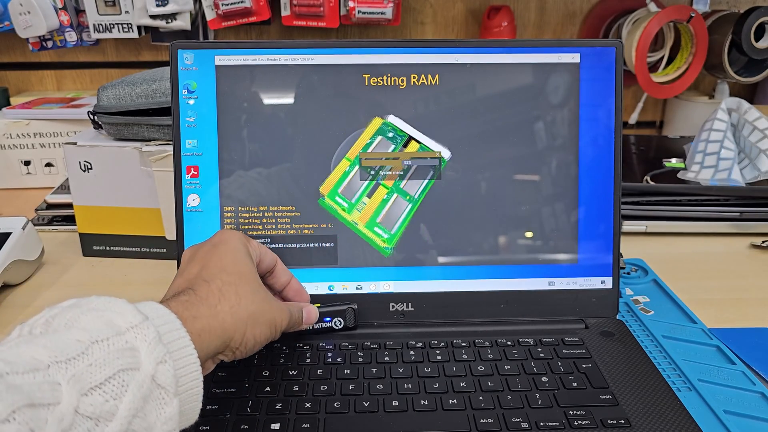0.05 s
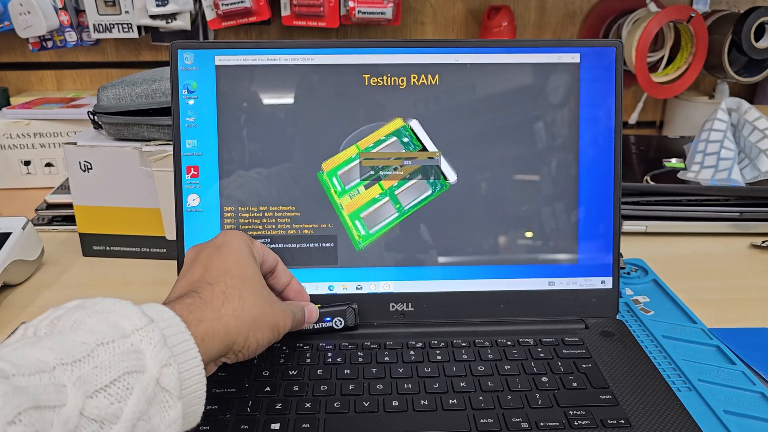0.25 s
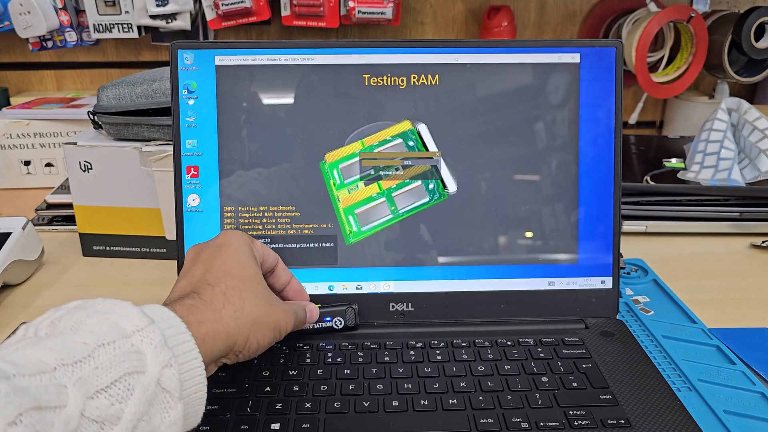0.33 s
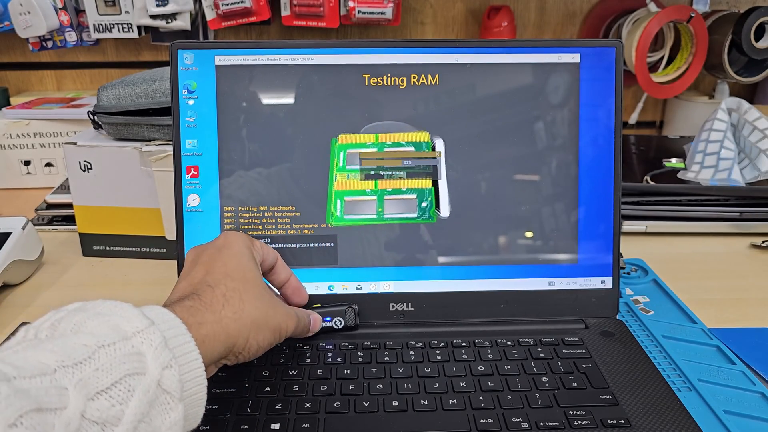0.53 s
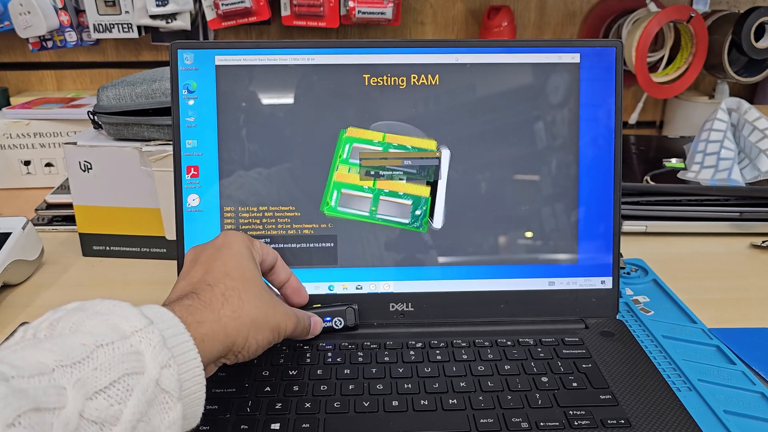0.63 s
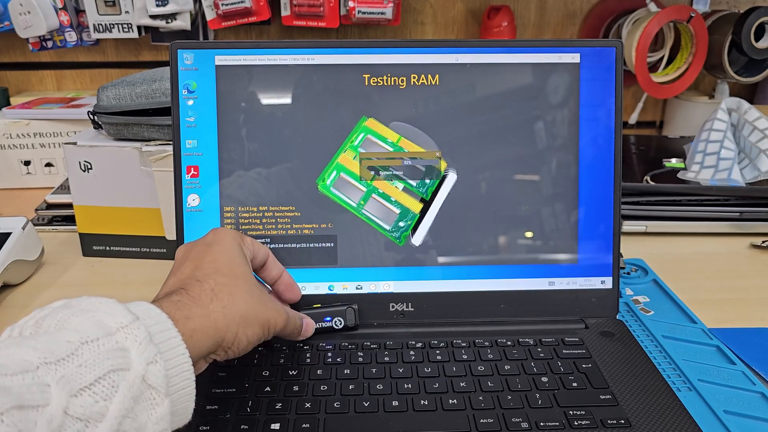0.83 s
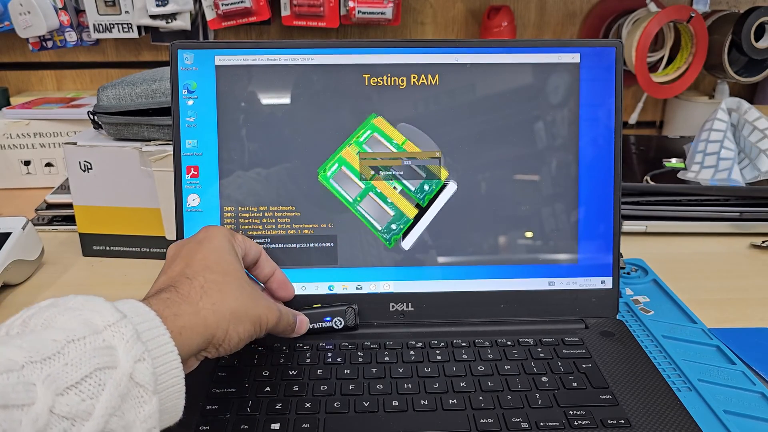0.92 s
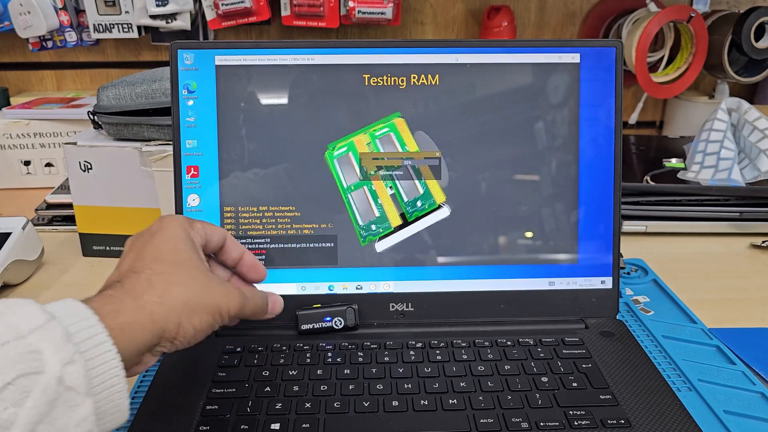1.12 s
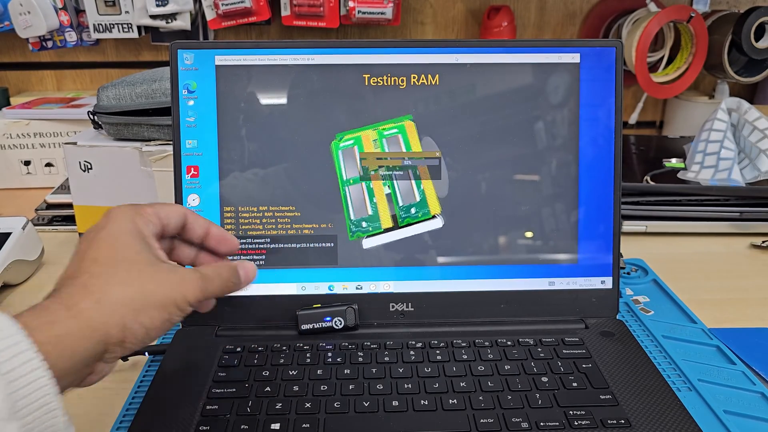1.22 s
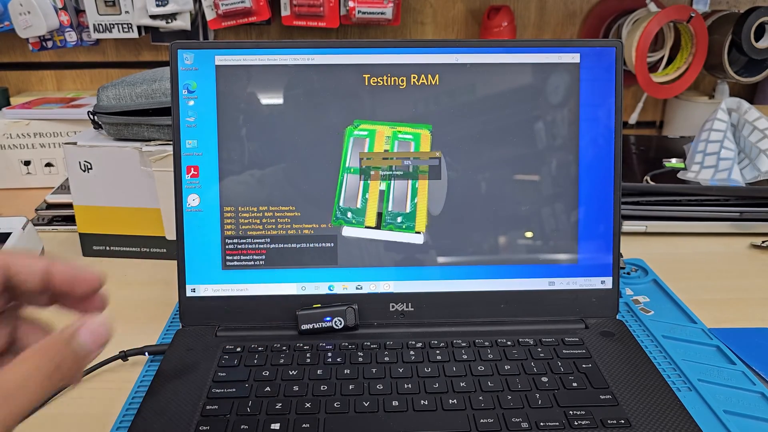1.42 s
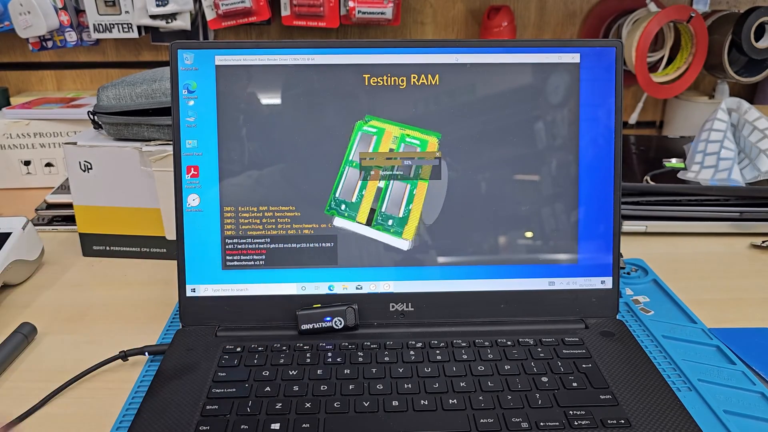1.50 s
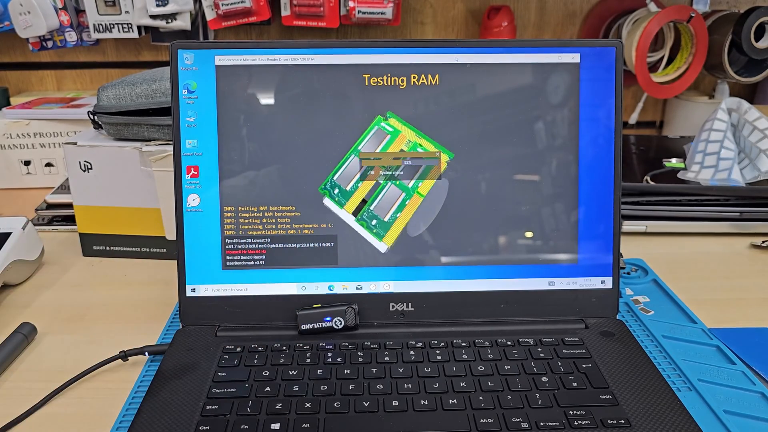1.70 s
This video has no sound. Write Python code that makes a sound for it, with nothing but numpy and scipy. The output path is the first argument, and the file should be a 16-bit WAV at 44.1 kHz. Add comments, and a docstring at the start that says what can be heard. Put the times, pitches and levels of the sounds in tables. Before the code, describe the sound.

Plastic clatters briefly against a laptop case while its cooling fan blows softly.

```python
"""A small plastic stick scrapes, knocks and rattles on a laptop's case as fingers let go of it,
then is nudged a few times. Each blow excites the damped modes of case and stick; a brief bright
hiss swells into the first loud knock. Throughout, the cooling fan drives turbulent air through
the vent: a steady hiss with faint whistles, which dulls a little as the hand moves off.
A low hum wavers beneath it in the workshop."""
import sys
import numpy as np
from scipy import signal
from scipy.fft import rfft, irfft
from scipy.io import wavfile
from scipy.ndimage import uniform_filter1d, map_coordinates

SR = 44100
rng = np.random.default_rng(int(sys.argv[2]) if len(sys.argv) > 2 else 0)


def transcribe(signal):
    """Save signal, clipped to [-1, 1], as a 16-bit WAV file at the path in sys.argv[1]."""
    frames = np.atleast_2d(signal).T
    limited = np.clip(frames, -1, 1)
    pcm = np.round(limited * 32767).astype(np.int16)
    wavfile.write(sys.argv[1], SR, pcm)


N = 77175
TIME = np.arange(N) / SR
FREQS = np.fft.rfftfreq(N, 1 / SR)

# Resonances of the stick: pitch_hz, width_hz, relative_db
STICK_MODES = [(2920, 250, -3.5), (3595, 380, 0), (4940, 1700, -17), (7120, 730, -15), (9760, 1600, -25)]


def knocks():
    """Impact excitation: each blow clicks and rings case and stick at its own loudness and brightness."""
    # Blows: start_s, case_gain_db, low_hz, top_hz, click_gain_db, click_centre_hz, stick_gain_db
    blows = [(.1382, -17.5, 203, 950, -26, 1290, -55), (0.1421, -3.5, 162, 866, -12.5, 1870, -34),
             (0.1602, -6, 101, 570, -24, 5000, -18.5), (0.1717, -13, 85.5, 477, -36, 3300, -25.5),
             (0.1773, -15.5, 110, 412, -48, 1500, -33), (0.2859, -16.5, 273, 410, -64, 800, -54),
             (.4455, -28.5, 197, 600, -62, 695, -62), (0.653, -25.5, 70, 140, -80, 600, -75),
             (0.7187, -28, 300, 660, -58, 800, -55), (0.7236, -28, 210, 240, -75, 600, -66)]
    out, case, stick = np.zeros(N), case_ring(), stick_ring()
    for start_s, case_db, low_hz, top_hz, click_db, click_hz, stick_db in blows:
        thud = cut(cut(case, low_hz, "high"), top_hz, "low", order=5)
        add(out, start_s, amp(case_db) * thud)
        add(out, start_s, amp(click_db) * click(click_hz))
        add(out, start_s, amp(stick_db) * stick)
    return out


def case_ring():
    """Modal superposition: the struck case sounds hollow, a sum of damped sinusoids."""
    # Modes of the case: pitch_hz, relative_db, t60_s
    modes = [(150, -20.5, 0.04), (240, -15, 0.02), (351, -7.5, 0.018), (410, -20.5, 0.065),
             (540, -12, 0.021), (622, -13, 0.028), (751, -7, 0.021)]
    t = TIME[:SR // 5]
    return sum(amp(db - 60 * t / t60) * np.sin(2 * np.pi * hz * t) for hz, db, t60 in modes)


def stick_ring(t60_s=0.008):
    """Free vibration: the stick's bright modes start in alternating polarity and decay together."""
    t = TIME[:SR // 10]
    modes = sum((-1) ** k * amp(db) * np.sin(2 * np.pi * hz * t)
                for k, (hz, _, db) in enumerate(STICK_MODES))
    return amp(-60 * t / t60_s) * modes


def click(centre_hz, t60_s=0.011, ring_db=-21.5, ring_t60_s=0.063, spread_octaves=2.14):
    """Contact transient: a brief burst of plastic chatter is broadband and leaves a faint ring."""
    # Spectrum of the plastic click: frequency_hz, relative_db
    spectrum = [(400, -7), (850, -6.5), (1100, 2.5), (2000, 2), (2650, 2.5), (3000, -1.5), (3700, -3),
                (4500, -3.5), (6000, -8.5), (9000, -15), (12000, -34), (15500, -53)]
    t = TIME[:SR // 10]
    fade = amp(-60 * t / t60_s) + amp(ring_db - 60 * t / ring_t60_s)
    chatter = rng.standard_normal(len(t)) * fade
    for _ in range(4):  # even out the spectrum, then restore the decay
        flat = irfft(np.exp(1j * np.angle(rfft(chatter))), len(t))
        chatter = np.sign(flat) * fade
    octaves = np.log2((FREQS + 1) / centre_hz)
    colour = spectral_gain(spectrum) * np.exp(-.5 * (octaves / spread_octaves) ** 2)
    sound = signal.fftconvolve(chatter, minimum_phase(colour))[:len(t)]
    return sound * np.linalg.norm(fade) / np.linalg.norm(sound)


def scrapes(sag_per_s=10, grit_db=0.5, grit_s=0.0023, rustle_db=-4):
    """Friction scrapes and a brief hiss: rub, rustle and squeak swell; the squeak sags past each peak."""
    # Scrapes, and a brief bright hiss swelling into the first loud knock:
    # start_s, peak_s, end_s, rub_db, squeak_db
    swells = [(0.031, 0.071, 0.1, -47, -55.5), (0.107, 0.133, 0.17, -41.5, -41),
              (0.181, 0.234, 0.2516, -39, -42.5), (.24, 0.269, .32, -53, -56.5)]
    # Resonances of the low rubbing: pitch_hz, width_hz, relative_db
    rub_modes = [(255, 79, -2), (376, 65, -3), (540, 230, -9.5)]
    # Spectrum of the dry rustle: frequency_hz, relative_db
    rustle_spectrum = [(500, -18), (1500, 4), (3000, 4.5), (6000, 0.5), (8500, -6), (10500, -13),
                       (12000, -26), (14500, -26), (15500, -35)]
    rub, squeak = (unit(sum(amp(db) * band(hz, width) for hz, width, db in modes))
                   for modes in (rub_modes, STICK_MODES))
    roughness = unit(cut(rng.standard_normal(N), 1 / grit_s, "low"))
    grit = unit(amp(grit_db * roughness))
    rustle = amp(rustle_db) * noise(spectral_gain(rustle_spectrum))
    out = np.zeros(N)
    for start_s, peak_s, end_s, rub_db, squeak_db in swells:
        swell = np.interp(TIME, [start_s, peak_s, end_s], [0, 1, 0])
        pitch_ratio = np.exp(-sag_per_s * np.maximum(TIME - peak_s, 0))
        sagging = map_coordinates(squeak, [np.cumsum(pitch_ratio)], order=3)
        out += swell * (amp(rub_db) * rub + amp(squeak_db) * grit * (swell * sagging + rustle))
    return out


def fan(hand_leaves_s=0.88, leaving_s=0.17, whistle_rise_db=0.5):
    """Flow noise: broadband vent hiss changes colour as the hand leaves; narrow bands whistle."""
    # Vent spectra with the hand on the laptop and away: frequency_hz, relative_db
    near_spectrum = [(18, -58), (30, -22), (45, -10), (65, 1), (140, -4), (200, -6.5), (390, -6.5),
                     (620, -5.5), (1020, -8), (1700, -7.5), (2300, -11), (3300, -8.5), (4100, -14),
                     (4750, -13), (5500, -20), (6900, -27.5), (7750, -34.5), (8050, -44.5), (11000, -54),
                     (15500, -59)]
    away_spectrum = [(18, -58), (30, -23), (45, -13), (65, -9), (130, -6.5), (200, -14), (280, -10.5),
                     (480, -13), (620, -10.5), (1500, -12.5), (2100, -12.5), (3200, -13.5), (4100, -17.5),
                     (5000, -19.5), (5500, -23.5), (6850, -32.5), (7100, -38.5), (8050, -48), (11000, -58),
                     (15500, -67)]
    # Fan whistles: pitch_hz, level_db
    tones = [(275, -68.5), (614, -66), (1023, -66.5), (1480, -68), (2519, -66), (2961, -65.5), (3402, -73),
             (8430, -103), (11250, -102)]
    away = np.clip((TIME - hand_leaves_s) / leaving_s + .5, 0, 1)
    air = np.sqrt(1 - away) * airflow(near_spectrum, level_db=-47)  # equal-power crossfade
    air += np.sqrt(away) * airflow(away_spectrum, level_db=-47.5)
    whistles = sum(amp(db) * band(hz, width_hz=46) for hz, db in tones)
    return air + amp(whistle_rise_db * (away - 0.5)) * whistles


def airflow(spectrum, level_db, patch_depth_db=1.5):
    """Turbulence: hiss fluctuates in faint random patches of frequency and time."""
    cells = signal.stft(noise(spectral_gain(spectrum)), nperseg=512)[2]
    patches = uniform_filter1d(rng.standard_normal(cells.shape), size=7, axis=0)
    patches = unit(uniform_filter1d(patches, size=12, axis=1))
    hiss = signal.istft(cells * amp(patch_depth_db * patches), nperseg=512)[1][:N]
    return amp(level_db) * hiss / np.std(cut(hiss, 200, "high"))  # level applies above the rumble


def hum():
    """Interference: two low tones waver against narrow noise at their own pitch, and swell together."""
    # Tones of the room hum: pitch_hz, width_hz, level_db
    tones = [(68.3, 2.8, -60.5), (99.2, 3.5, -63.5)]
    # Swell of the hum: time_s, gain_db
    swell = [(0, -7), (.4, 3), (.68, -1), (.9, -12), (1.05, 7.5), (1.25, 0.5), (1.34, 9), (1.58, 4.5),
             (1.7, -10)]
    drone = sum(amp(db) * unit(np.sin(2 * np.pi * (hz * TIME + rng.random())) + band(hz, width))
                for hz, width, db in tones)
    return amp(np.interp(TIME, *np.transpose(swell))) * drone


def room(x, tail_db=-22.5, t60_s=0.18, top_hz=6260):
    """Reverberation: diffuse reflections in the cluttered workshop add a weak, short tail."""
    t = TIME[:SR // 2]
    envelope = amp(-60 * t / t60_s) * np.minimum(t / 0.002, 1)
    tail = cut(rng.standard_normal(len(t)), top_hz, "low") * envelope
    return x + amp(tail_db) * signal.fftconvolve(x, tail / np.linalg.norm(tail))[:N]


def amp(db):
    """Decibels to amplitude ratio."""
    return 10 ** (np.asarray(db) / 20)


def unit(x):
    """Normalisation to rms 1."""
    return x / np.sqrt(np.mean(x ** 2) + 1e-20)


def spectral_gain(points):
    """Gain at FREQS, by interpolating decibels on a log-frequency axis."""
    hz, db = np.transpose(points)
    return amp(np.interp(np.log(FREQS + 1), np.log(hz + 1), db))


def add(mix, start_s, sound):
    """Superposition of a sound on the mix from start_s."""
    part = mix[max(round(start_s * SR), 0):][:len(sound)]
    part += sound[:len(part)]


def cut(x, hz, kind, order=2):
    """Maximally flat low-pass or high-pass filter."""
    return signal.sosfilt(signal.butter(order, min(hz, SR * .45), kind, fs=SR, output="sos"), x)


def noise(gain):
    """Random-phase noise of rms 1 with the given spectrum."""
    return unit(irfft(gain * np.exp(2j * np.pi * rng.random(len(FREQS))), N))


def band(hz, width_hz):
    """Noise in one steep-sided resonance."""
    return noise(1 / (1 + (2 * (FREQS - hz) / width_hz) ** 2))


def minimum_phase(gain):
    """Shortest causal impulse response with the given spectrum."""
    log_gain = np.log(np.maximum(np.r_[gain, gain[:0:-1]], 1e-5))
    return np.fft.ifft(np.exp(np.conj(signal.hilbert(log_gain)))).real[:2048]


def scene():
    """Superposition: fan and hum lie under the reverberant knocks and scrapes, in mono."""
    return (fan() + hum() + room(knocks() + scrapes()))[None]


def record(dry, hiss_db=-80, top_hz=15900):
    """Self-noise and bandwidth: the microphone adds faint hiss, then a low-pass limits the treble."""
    noisy = dry + amp(hiss_db) * rng.standard_normal(dry.shape)
    low_pass = signal.firwin(511, top_hz, window=("kaiser", 9), fs=SR)
    return signal.oaconvolve(noisy, low_pass[None], "same")


dry = scene()
out = record(dry)
transcribe(out)
```